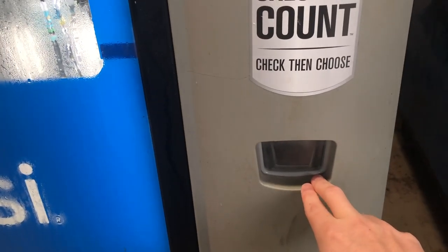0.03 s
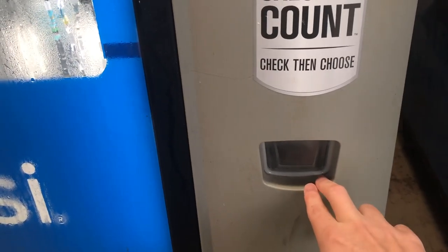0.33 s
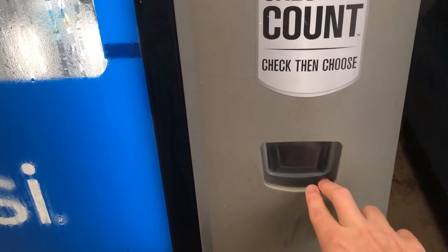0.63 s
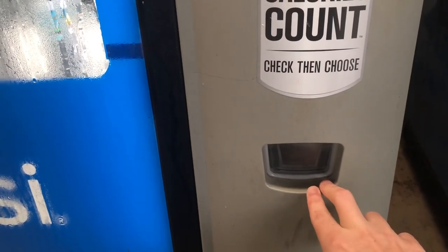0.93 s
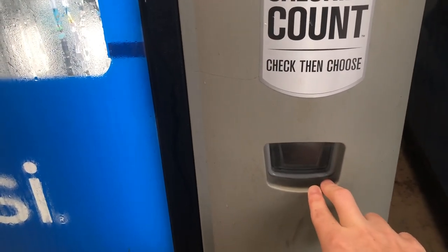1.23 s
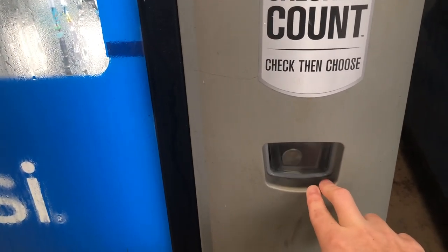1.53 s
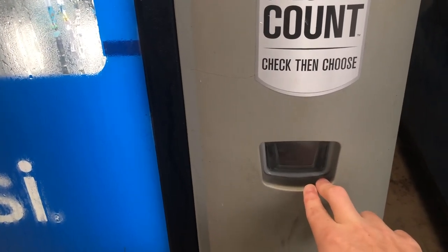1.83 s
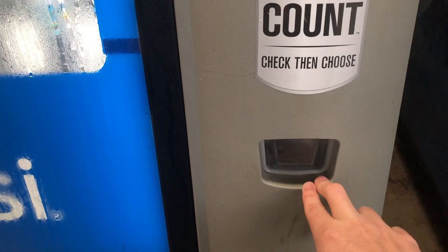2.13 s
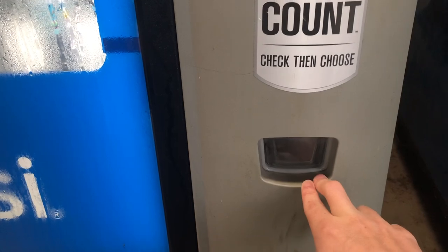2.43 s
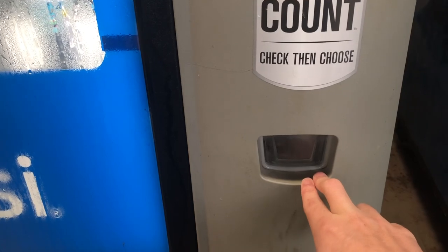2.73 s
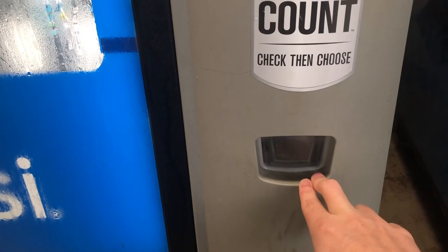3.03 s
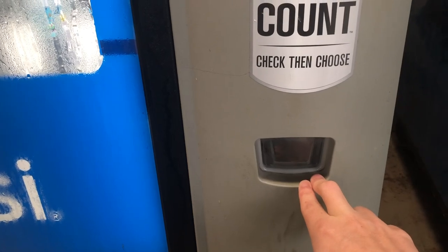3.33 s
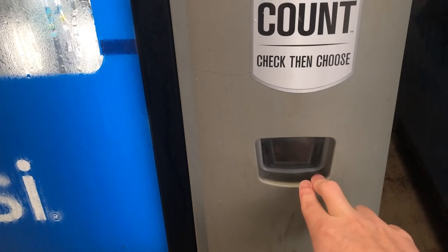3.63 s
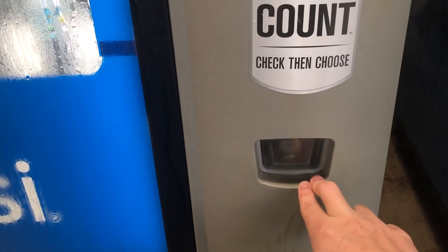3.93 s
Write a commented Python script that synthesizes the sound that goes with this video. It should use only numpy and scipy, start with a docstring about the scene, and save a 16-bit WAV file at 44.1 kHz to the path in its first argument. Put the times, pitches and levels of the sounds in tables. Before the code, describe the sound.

Coins clatter and ring in the metal return cup of a nearby vending machine, five in an even sequence. Small mechanical clicks come before and between the drops, while the compressor hums and a fan rushes softly throughout.

```python
"""A vending machine's cooling unit hums, its fan rushes, and the payout mechanism starts to click and ping.
From 0.7 s five coins drop down the chute, about 0.8 s apart. Each lands with a hollow knock, then
bounces to rest in the metal return cup: the blows rattle the sheet metal, ring the cup and set the
coin singing very high. The mechanism clicks and pings on between the coins; the last lands at 3.9 s."""
import sys
import numpy as np
from scipy import signal
from scipy.fft import rfft, irfft
from scipy.io import wavfile

SR = 44100
rng = np.random.default_rng(int(sys.argv[2]) if len(sys.argv) > 2 else 0)


def generate_wav(sig):
    """Save sig (samples, or channels by samples) to the path in sys.argv[1] as 16-bit PCM at SR."""
    pcm = np.round(np.clip(np.atleast_2d(sig).T, -1, 1) * 32767).astype(np.int16)
    wavfile.write(sys.argv[1], SR, pcm)


N = 176400
T = np.arange(N) / SR
HZ = np.maximum(np.arange(N // 2 + 1) * SR / N, 1)


def undb(db):
    """Decibels to gain."""
    return 10 ** (np.asarray(db) / 20)


def eq_curve(points):
    """Gain per frequency of an EQ curve, scaled to keep white noise at its power."""
    hz, db = np.array(points).T
    gain = undb(np.interp(np.log(HZ), np.log(hz), db))
    return gain / np.sqrt(np.mean(gain ** 2))


def equalise(x, gain):
    """Minimum-phase EQ, so nothing rings ahead of an attack."""
    cepstrum = irfft(np.log(gain + 1e-6), N)
    cepstrum[1:N // 2] *= 2
    cepstrum[N // 2 + 1:] = 0
    impulse = irfft(np.exp(rfft(cepstrum)), N)[:4096]
    return signal.fftconvolve(x, impulse)[:N]


def add(out, at, x):
    """Mix x into out at a time in seconds."""
    i = max(int(at * SR), 0)
    out[i:i + len(x)] += x[:max(N - i, 0)]


def wander(rate_hz):
    """Smooth random modulation with a spread near 1."""
    knots = rng.standard_normal(1024)
    return np.interp(T * rate_hz, np.arange(len(knots)), knots)


def burst(t, hold_s, decay_s):
    """Envelope that holds, then dies away."""
    return np.exp(-np.maximum(t - hold_s, 0) / decay_s)


def resonate(x, hz, t60):
    """One decaying mode driven by x, gain 1 at its pitch."""
    r = np.exp(-np.log(1000) / (t60 * SR))
    return 2 * (1 - r) * signal.lfilter([1], [1, -r * np.exp(2j * np.pi * hz / SR)], x).real


def note(t, hz, t60):
    """A mode struck once."""
    return np.sin(2 * np.pi * (hz * t + rng.random())) * np.exp(-np.log(1000) * t / t60)


def room(x, t60=.19, wet_db=-17.5, dull_hz=5000):
    """The cabinet and the walls around it add a faint, dull tail."""
    tail = rng.standard_normal(N) * undb(-60 * T / t60) * (T > .008)
    wet = signal.fftconvolve(x, tail / np.sqrt(np.sum(tail ** 2)))
    return x + undb(wet_db) * equalise(wet, 1 / np.hypot(1, HZ / dull_hz))


# EQ of the fan's air: (frequency [Hz], gain [dB])
FAN_EQ = [(20, -24), (40, -15), (48, -1), (110, -0.5), (160, -1.5), (225, 6.5), (275, -3), (350, -0.5),
          (450, -9), (515, -5.5), (580, -8.5), (730, -7), (1000, -12), (1500, -13.5), (2200, -19),
          (3200, -21), (5000, -26.5), (7500, -32.5), (11000, -33), (15500, -40.5)]

def fan_air(level_db=-32.5, flicker_db=.5):
    """The fan lays down a bed of low, rushing air whose level flickers slightly."""
    air = irfft(rfft(rng.standard_normal(N)) * eq_curve(FAN_EQ), N)
    return air * undb(level_db + flicker_db * wander(24.99))


# tones of compressor and fan: (pitch [Hz], level [dB])
HUM_TONES = [(58.9, -30), (120, -42), (125.3, -44.5), (129.3, -40.5), (145.5, -42), (249.5, -42),
             (258.5, -36.5), (311, -47)]

def cooler_hum(waver_db=1.5, waver_hz=3.02):
    """The compressor drones almost steadily under higher tones that waver more."""
    hum = 0
    for k, (hz, db) in enumerate(HUM_TONES):
        waver = waver_db * wander(waver_hz) * (1 if k else .3)
        hum += undb(db + waver) * np.sin(2 * np.pi * (hz * T + rng.random()))
    return hum


# EQ of the loose parts: (frequency [Hz], gain [dB])
TICK_EQ = [(300, -12), (1000, -3), (2700, 4.5), (5000, -15.5), (8000, -3), (16000, -13)]

def loose_parts(ticks_per_s=16, level_db=-49, scatter_db=6, decay_s=.011):
    """Loose parts tick faintly and at random inside the running machine."""
    triggers = rng.random(N) < ticks_per_s / SR
    ticks = triggers * undb(level_db + scatter_db * rng.standard_normal(N))
    envelope = signal.lfilter([1], [1, -np.exp(-1 / (decay_s * SR))], ticks)
    return equalise(envelope * rng.standard_normal(N), eq_curve(TICK_EQ))


# cues of the spring catch: (time [s], level [dB])
PING_CUES = [(.3935, -30), (0.4367, -30.5), (1.1914, -29.5), (1.2351, -28), (1.9944, -30), (2.0376, -32.5),
             (2.797, -29), (2.8391, -30.5), (3.5957, -28.5)]
# EQ of the catch: (frequency [Hz], gain [dB])
PING_EQ = [(1000, -13), (3000, -10.5), (5200, -8), (6500, -10), (7400, -2), (8000, 3.5), (8600, -7),
           (9300, -14), (10500, -8.5), (13000, -13.5), (16000, -13)]

def spring_pings(spring_hz=8030, spring_db=-8, size=4096):
    """A small catch snaps, and each snap rings its spring."""
    t, snaps = np.arange(size) / SR, np.zeros(N)
    for at, db in PING_CUES:
        add(snaps, at, undb(db) * rng.standard_normal(size) * burst(t, hold_s=.0026, decay_s=.0076))
    spring = undb(spring_db) * resonate(snaps, spring_hz, t60=.067)
    return equalise(snaps + spring, eq_curve(PING_EQ))


def crossover(lows, highs, hz):
    """Join the bottom of one signal to the top of another, at 24 dB per octave."""
    def band(x, kind):
        section = signal.butter(2, hz, kind, fs=SR, output="sos")
        return signal.sosfilt(np.tile(section, (2, 1)), x)
    return band(lows, "low") + band(highs, "high")


def rebounds(t, taps_per_s=350, fade_s=.042, grain_s=.0036):
    """Power envelope of a chattering edge: tiny random taps that die away."""
    taps = (rng.random(len(t)) < taps_per_s / SR) * np.exp(-2 * t / fade_s)
    grains = signal.lfilter([1], [1, -np.exp(-2 / (grain_s * SR))], taps)
    return grains * 2 / (grain_s * taps_per_s)


# EQ of struck sheet metal: (frequency [Hz], gain [dB])
METAL_EQ = [(120, -19), (300, -8.5), (700, -10), (1000, -2.5), (1250, -5), (1550, -1), (2400, 0), (3300, 0),
            (3700, -1.5), (5000, -5), (5800, -5.5), (8200, -6.5), (11300, -2.5), (13500, -5), (14600, -6),
            (16000, -9)]

def metal_hits(cues, contact_s, rise_s, crack_s=.0071, thud_lag_s=.0013, size=8192):
    """Hard blows on sheet metal: a crack, a short shiver of the panels and the chatter of an edge."""
    t = np.arange(size) / SR
    shiver = undb(-12) * burst(t, hold_s=0, decay_s=.015)
    thud_shape = burst(t, contact_s + 2 * thud_lag_s, crack_s)
    thud_attack = 1 - np.exp(-t / thud_lag_s)
    crack_shape = burst(t, contact_s, crack_s)
    treble_shape = burst(t, hold_s=.0011 + 2 * rise_s, decay_s=.0051)
    low, mid, high = np.zeros((3, N))
    for at, db, thud_db, treble_db, chatter in cues:
        noise = undb(db) * rng.standard_normal(size) * (1 - np.exp(-t / rise_s))
        tail = np.sqrt(chatter ** 2 * rebounds(t) + shiver ** 2)
        add(low, at, undb(thud_db) * noise * np.hypot(thud_shape, tail) * thud_attack)
        add(mid, at, noise * np.hypot(crack_shape, tail))
        add(high, at, undb(treble_db) * noise * np.hypot(treble_shape, tail))
    body = crossover(low, mid, hz=1340)
    return equalise(crossover(body, high, hz=6700), eq_curve(METAL_EQ))


# cues of the payout levers: (time [s], level [dB], thud [dB], treble [dB], chatter [0-1])
LEVER_CUES = [(.001, -24, 1.5, -9.5, 0.28), (.087, -38, -3, 5.5, 0), (.2196, -29, -18, -2.5, 0),
              (.2897, -17.5, 3.5, 0, 0), (.3641, -26, 8.5, -7, .1), (.3935, -44.5, 25, 0, 0.7),
              (.592, -42, 0, 6, 0.2), (.6185, -37, 0, -4, 0.3), (1.0136, -36, 13, -9, 0.3),
              (1.0505, -33.5, 9, -17, 0.2), (1.1019, -34, -36, -1.5, .2), (1.1518, -33.5, 5.5, -16, 0.9),
              (1.292, -35.5, 4, -9, 0), (1.3463, -34.5, -12, -7, .3), (1.385, -35, 3, -14, 0.7),
              (1.418, -36.5, -4, 1, 0), (1.9944, -38, 14, 7, 0), (2.0757, -38, -9, -5, 0),
              (2.152, -37, 5, -15, .7), (2.174, -37, -7, -8, 1), (2.6838, -40, 16.5, -11, 0.5),
              (2.7057, -35, 7, 0.5, .2), (2.7252, -36, 9, -8, 0.4), (2.785, -31, -21, 0, 0.2),
              (2.7965, -36, -14, 4, 0), (2.842, -27.5, -9, -2.5, 0), (2.8833, -35, 1, -11, 0.4),
              (2.9617, -26, -5, -1, 0.2), (2.990, -37, -8, 1, 0.3), (3.022, -38, -3, -5, .4),
              (3.4905, -33.5, 5, -5, 0.9), (3.650, -39, 6.5, -4, 0.7), (3.7339, -35, 4.5, -17, 0.7),
              (3.797, -29, -11, -12, 0.47), (3.806, -30, -10, -9, 0.2), (3.8511, -41, -4, -8, 0.2)]

def lever_clicks():
    """Levers click inside the cabinet, with a softer attack than the coins."""
    return metal_hits(LEVER_CUES, contact_s=.0059, rise_s=.0011)


# modes of the return cup: (pitch [Hz], gain [dB], t60 [s])
CUP_MODES = [(519, 4, 0.075), (1010.5, 4.5, 0.065), (1054, 4.5, 0.064), (1390, -1, 0.041),
             (1521, 1.5, 0.073), (2193, -1.5, 0.036), (2360, -1.5, 0.18), (2623, 3, .045), (3100, 6, 0.069),
             (3408, -2, 0.023), (4030, -5.5, 0.02), (4460, 1.5, 0.05), (4863, 0, 0.012), (5170, 2, 0.058),
             (6470, -1.5, 0.061)]

def cup(x, direct_db=-2, scatter_db=5, spot_changes_hz=30):
    """The cup rings after whatever shakes it; mode gains wander, as each struck spot favours others."""
    ringing = 0
    for hz, db, t60 in CUP_MODES:
        drive = x * undb(db + scatter_db * wander(spot_changes_hz))
        ringing += resonate(drive, hz, t60)
    return undb(direct_db) * x + ringing


# cues of the landings: (time [s], level [dB], boom [dB])
LANDING_CUES = [(0.6669, -29.5, 12.5), (.7095, -27.5, 12), (1.5115, -22, -6), (2.4055, -16.5, -8),
                (3.1834, -21.5, 5.5), (3.9238, -27, 11.5)]
# modes of the chute's foot: (pitch [Hz], gain [dB], t60 [s])
CHUTE_MODES = [(367, -7.5, 0.075), (430, -7, .08), (504.5, -7.5, .12), (719, -9, 0.13), (775, -4, 0.054),
               (969.5, 1.5, .14), (1462, 1.5, 0.12), (1910, -3, 0.12), (2360, 5, 0.044), (2496, 10, 0.037),
               (3960, -8, 0.28)]

def chute_knocks(boom_below_hz=850, rise_s=.00069, size=16384):
    """A coin lands at the foot of the chute and rings it with a hollow knock."""
    t, out = np.arange(size) / SR, np.zeros(N)
    for at, db, boom_db in LANDING_CUES:
        knock = sum(undb(mode_db + boom_db * (hz < boom_below_hz)) * note(t, hz, t60)
                    for hz, mode_db, t60 in CHUTE_MODES)
        add(out, at, undb(db) * knock * (1 - np.exp(-t / rise_s)))
    return out


# cues of the clinks: (time [s], pitch [Hz], level [dB], t60 [s])
CLINK_CUES = [(.001, 9550, -42, 0.2), (.2897, 1040, -24.5, 0.22), (.3641, 1040, -29, 0.3),
              (.7946, 2980, -16, 0.067), (.8215, 3200, -19, .08), (.838, 2260, -8, 0.027),
              (.9305, 1060, -24, .1), (.9787, 1030, -26, 0.09), (1.573, 1030, -22, .06),
              (1.6442, 9400, -41, .2), (1.690, 3130, -36, .15), (1.770, 3330, -33, 0.057),
              (1.819, 2260, -22, 0.059), (2.465, 9750, -33, 0.21), (3.290, 2570, -20, 0.078),
              (3.308, 1500, -18.5, 0.14), (3.438, 2570, -33, 0.11)]

def rim_clinks(detune=.0123, size=16384):
    """A rim catches the metal and gives one clear note, a close pair of beating modes."""
    t, out = np.arange(size) / SR, np.zeros(N)
    for at, hz, db, t60 in CLINK_CUES:
        pair = note(t, hz, t60) + .5 * note(t, hz * (1 - detune), t60)
        add(out, at, undb(db) * pair)
    return out


# coin blows in chute and cup: (time [s], level [dB], thud [dB], treble [dB], chatter [0-1])
BOUNCE_CUES = [(.667, -12.5, 1.5, -1, 0.16), (0.7085, -9, 6.5, 3, 0.02), (0.729, -26.5, 11.5, -1, 0.6),
               (.754, -26, -6, -2.5, 1), (0.7945, -19, 5.5, 2, .2), (0.8225, -18.5, 9, 2.5, 0.12),
               (.839, -20, -1, 0.5, 0), (.858, -29, -4, -1, 0), (0.8894, -27, -1, 1, 1),
               (0.9238, -17.5, -19, 3.5, 0), (0.931, -17.5, 7.5, -1, 0.18), (0.9783, -21.5, 5.5, -8, 0.12),
               (1.5108, -11, 7, 2, .2), (1.5706, -22, 12.5, -8, 0.51), (1.605, -27, 9.5, -10, 0.33),
               (1.626, -33.5, -13, -5, 0.7), (1.6442, -33.5, 12, 5, 0.47), (1.681, -36.5, -7, -4, 0.9),
               (1.698, -35.5, 9.5, -7, 0.76), (1.770, -19.5, 5, 1, 0.6), (1.798, -29.5, 12, 4, 0.2),
               (1.811, -19.5, 8, -9, 0.2), (1.823, -28.5, -1, 1, 0.63), (1.856, -31.5, 11.5, 0.5, 0.87),
               (1.872, -29, -2, -1, 0.2), (1.902, -38, 15, -6, 0.73), (2.388, -24, -2, -15, 0),
               (2.405, -9.5, 4.5, -3, 0.16), (2.4173, -10.5, 1.5, 3, 0.17), (2.439, -18, 6.5, -12, 0.17),
               (2.448, -23, 9, 4, 0.1), (2.499, -26, -4, -1, 0), (2.508, -18.5, -2.5, -6, 0),
               (2.560, -18, 6, -0.5, 0.2), (2.568, -26, 7, -13, 0.1), (2.589, -13, -4.5, 1.5, 0),
               (2.605, -25, 4, -1, 0.54), (2.633, -25, 6.5, -2, 0), (3.183, -9, 4.5, -2.5, 0.08),
               (3.2, -28.5, 15, 6, 0.35), (3.212, -20, 4, -6, 0), (3.290, -15.5, 4, -5, 0.2),
               (3.304, -9, 0, -1.5, 0.2), (3.344, -17.5, 6.5, -6, .2), (3.376, -19, 2.5, -1.5, 0),
               (3.4176, -28.5, 7, -1, 0.1), (3.437, -30, -7, -6, 0.2), (3.923, -14, -10, 3, 0),
               (3.942, -26, 1, 6, 0.68), (3.963, -20.5, 8, -2, .4), (3.979, -33, -1, -2, 0.4)]
# each coin's voice: (sings from [s], ring [dB], twin ring [dB], shimmer pitch [Hz], shimmer gain [dB])
COIN_VOICES = [(.775, -9, -22, 9260, 7), (1.48, -14, -22, 9200, -11), (2.37, -19, -19, 9200, -17),
               (3.15, -28, -26, 8800, -12), (3.89, -11, -20, 12200, 7)]
# each coin's highest pair of modes: (ring pitch [Hz], twin pitch [Hz])
COIN_TUNING = [(15547, 15660), (15256, 15439), (15154, 15315), (15079, 15595), (15068, 15700)]

def coins(ring_t60=.17, shimmer_t60=.068, shimmer_spread=.0356, size=16384):
    """Bounces clatter, strike the coin's two very high modes and stir a lower, shimmering cluster."""
    t, singing = np.arange(size) / SR, np.zeros(N)
    clatter = metal_hits(BOUNCE_CUES, contact_s=.0027, rise_s=.0001)
    ends = [voice[0] for voice in COIN_VOICES[1:]] + [N / SR]
    for voice, (ring_hz, twin_hz), end in zip(COIN_VOICES, COIN_TUNING, ends):
        start, ring_db, twin_db, shimmer_hz, shimmer_db = voice
        own_clatter = clatter * ((T >= start) & (T < end))
        cluster_hz = shimmer_hz * (1 + shimmer_spread * rng.uniform(-1, 1, 5))
        singing += undb(shimmer_db) * sum(resonate(own_clatter, hz, shimmer_t60) for hz in cluster_hz)
        for at, db, _, treble_db, _ in BOUNCE_CUES:
            if start <= at < end:
                ring = undb(ring_db) * note(t, ring_hz, ring_t60)
                twin = undb(twin_db) * note(t, twin_hz, ring_t60)
                add(singing, at, undb(db + treble_db) * (ring + twin))
    return clatter + singing


def scene():
    """Mono mix: coins and mechanism ring the cup, knocks and clinks join in, over the cooling unit."""
    bed = cooler_hum() + fan_air()
    shaking = coins() + spring_pings() + lever_clicks() + loose_parts()
    foreground = cup(shaking) + chute_knocks() + rim_clinks()
    return (bed + room(foreground))[None]


def record(dry, top_hz=15740):
    """Soft saturation rounds the loudest peaks and a steep low-pass cuts the top."""
    low_pass = signal.ellip(10, .2, 80, top_hz, fs=SR, output="sos")
    return signal.sosfilt(low_pass, np.tanh(dry))


dry = scene()
out = record(dry)
generate_wav(out)
```